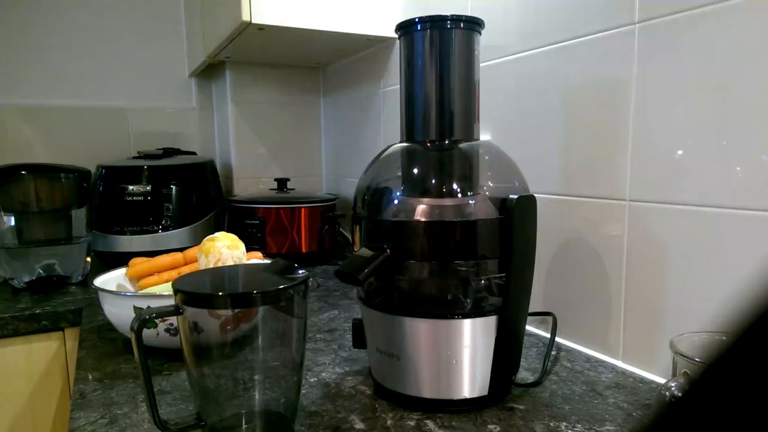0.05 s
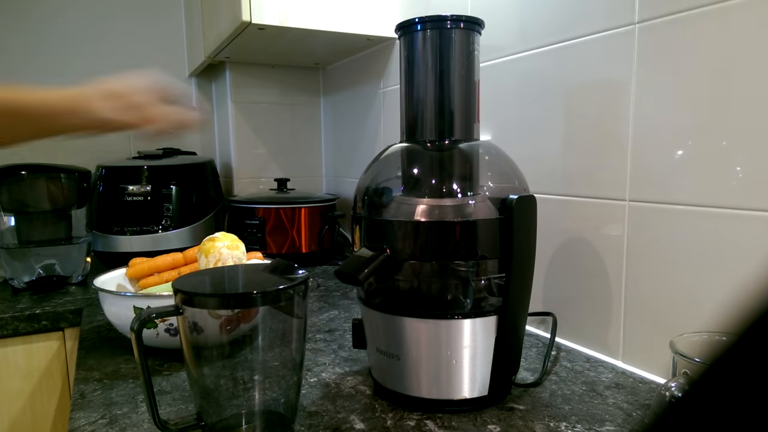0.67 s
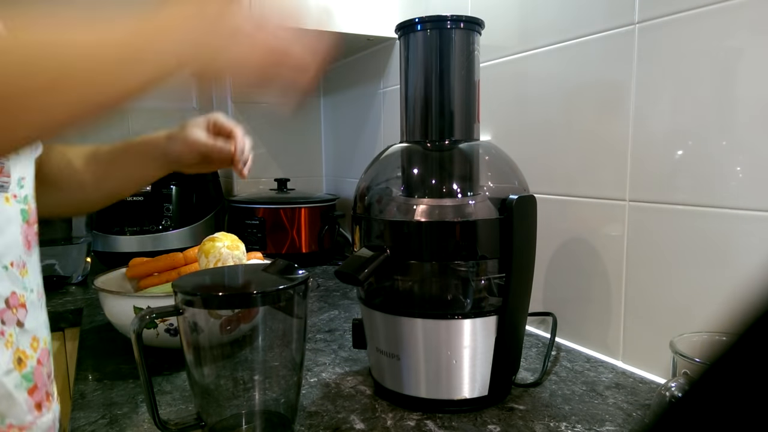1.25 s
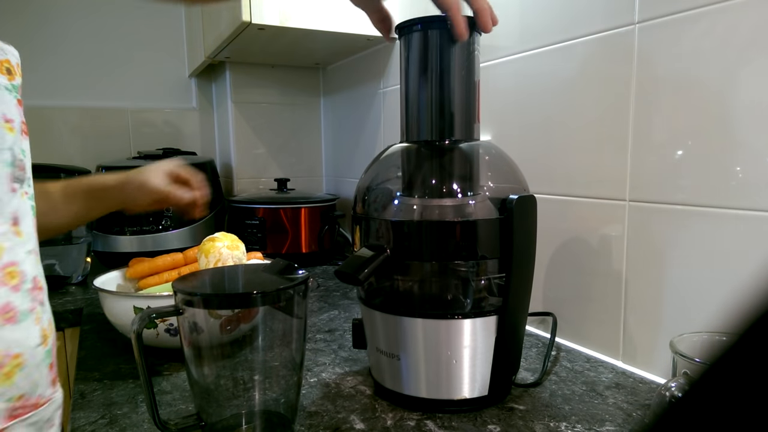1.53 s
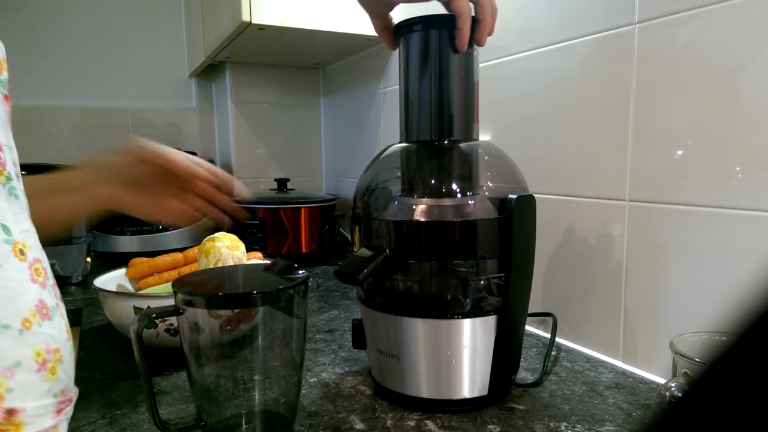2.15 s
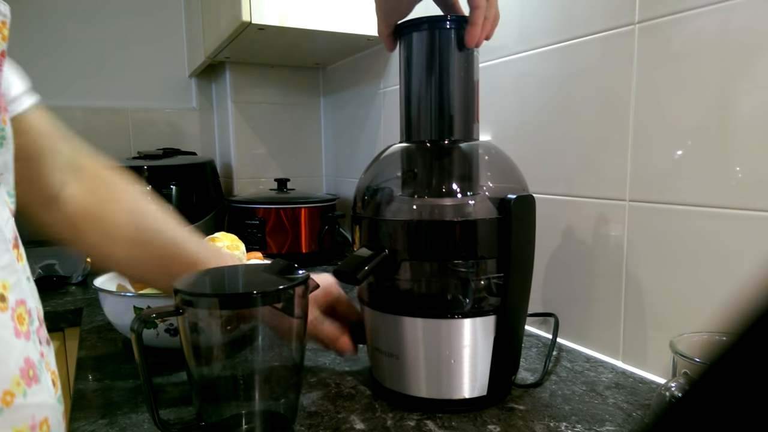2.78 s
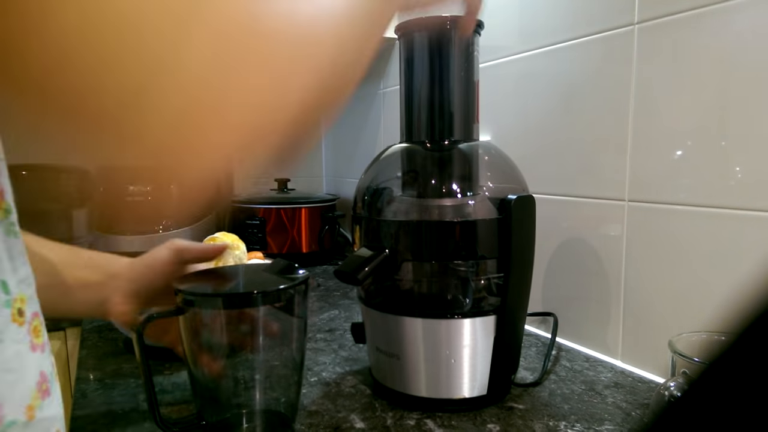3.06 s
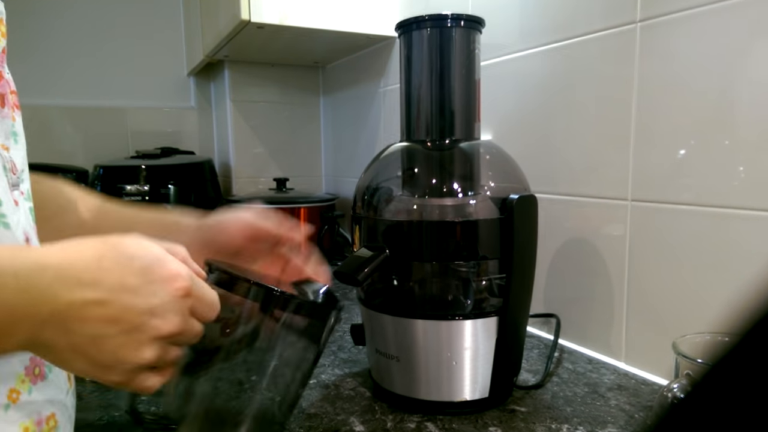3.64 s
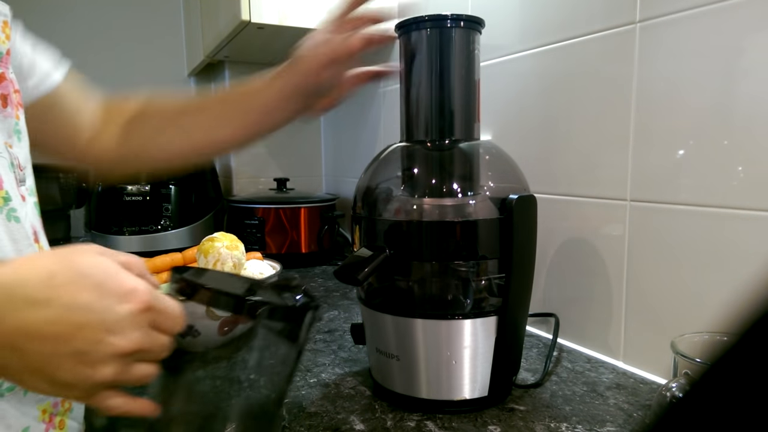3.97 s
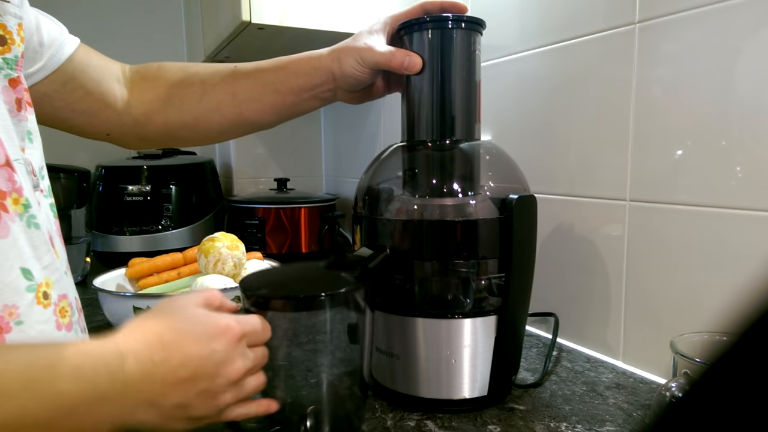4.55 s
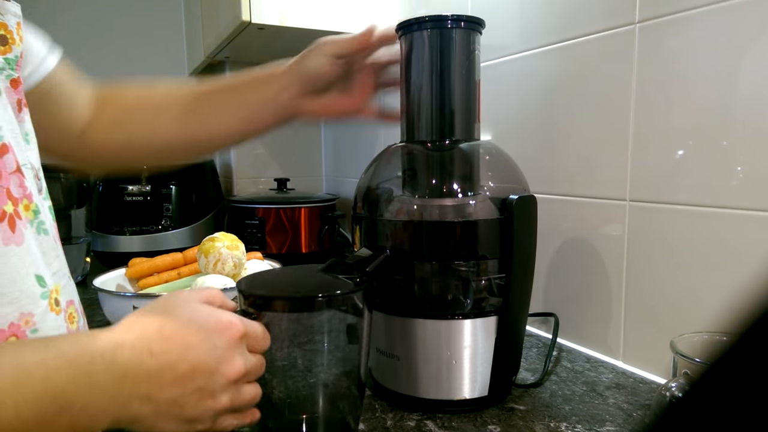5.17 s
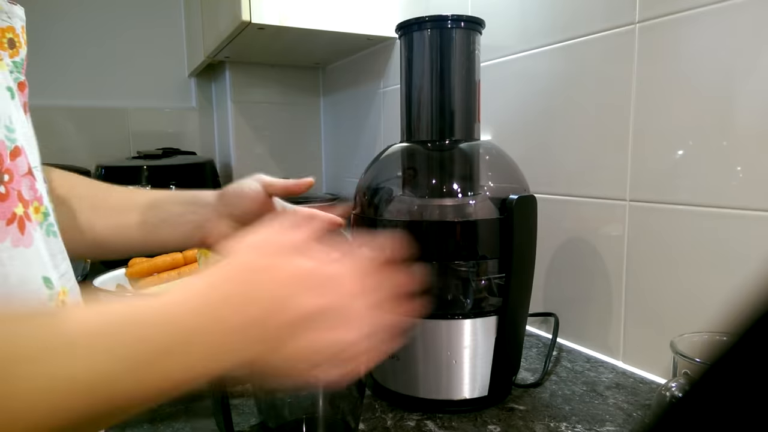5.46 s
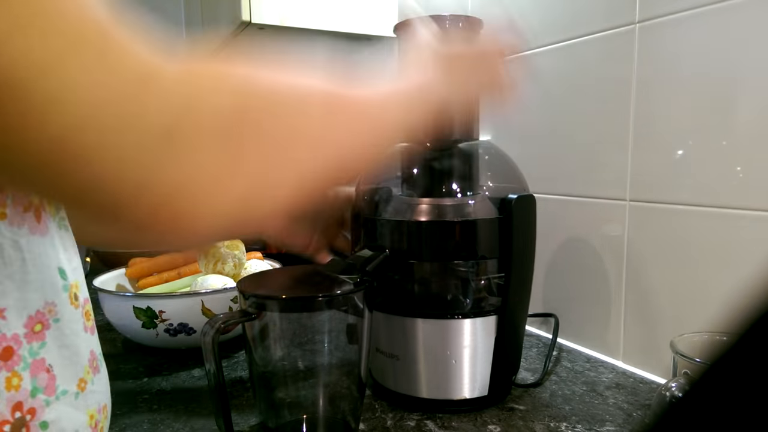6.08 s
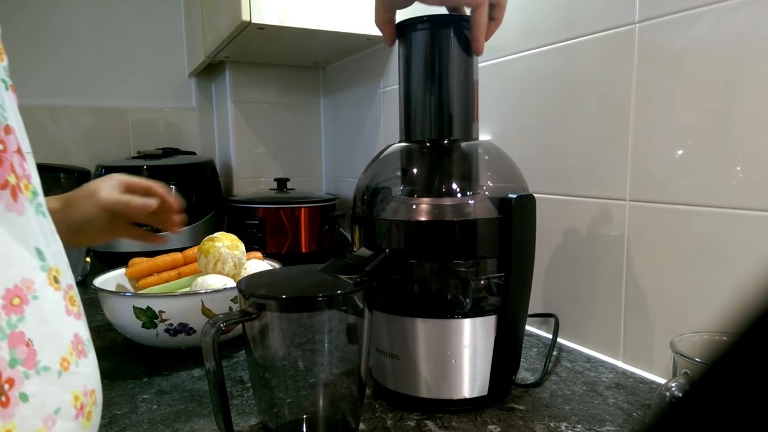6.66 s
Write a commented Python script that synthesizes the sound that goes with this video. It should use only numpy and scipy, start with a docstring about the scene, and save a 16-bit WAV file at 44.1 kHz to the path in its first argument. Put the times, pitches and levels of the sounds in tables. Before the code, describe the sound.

Faint room air in a tiled kitchen is broken by a quick run of hollow clacks as a plastic pusher drops into a juicer's feed tube. A switch snaps and the motor winds up with a brief rattle and a climbing whine, leveling off into a loud whir with hum and rushing air. While it runs empty, a plastic jug slides across the stone counter and knocks down twice, all heard from close by.

```python
"""Soft room air in a tiled kitchen, then a plastic pusher squeaks and clacks home in a juicer's feed tube.
The switch snaps and the mains motor winds up, spinning the empty centrifugal basket: a climbing whine
on multiples of the rotor speed, over rumble, a burst of chatter and the rush of air.
While it runs, a plastic jug is slid across the stone counter and set down under the spout."""
import sys
import numpy as np
from scipy import signal
from scipy.fft import rfft, irfft, next_fast_len
from scipy.io import wavfile

SR = 44100
rng = np.random.default_rng(int(sys.argv[2]) if len(sys.argv) > 2 else 0)


def file_out(sig):
    """Save sig as 16-bit WAV at sys.argv[1]."""
    # one column per channel
    cols = np.atleast_2d(sig).T
    # limit, then scale
    lim = np.clip(cols, -1, 1)
    pcm = np.round(lim * 32767).astype(np.int16)
    wavfile.write(sys.argv[1], SR, pcm)


N = 305172
TIME = np.arange(N) / SR
SIZE = next_fast_len(N + SR, True)
BINS = np.maximum(np.fft.rfftfreq(SIZE, 1 / SR), 1)
MAINS_HZ, MOTOR_ON_S = 50, 2.68
PULSE = 2 * np.pi * 2 * MAINS_HZ * TIME   # phase of the torque, which pulses twice per mains cycle


def from_db(db):
    return 10 ** (np.asarray(db) / 20)


def rms_one(x):
    return x / np.sqrt(np.mean(x ** 2) + 1e-20)


def butter(x, order, hz, kind):
    return signal.sosfilt(signal.butter(order, hz, kind, fs=SR, output="sos"), x)


def over_bins(points):
    """A curve by frequency, joined on a log axis."""
    hz, value = np.transpose(points)
    return np.interp(np.log(BINS), np.log(hz), value)


def ramp(start_s, length_s):
    """A straight fade from 0 to 1."""
    return np.clip((TIME - start_s) / length_s, 0, 1)


def swells(rows):
    """A smooth rise and fall for each (middle [s], length [s], level [dB])."""
    return sum(from_db(db) * np.cos(np.pi * np.clip((TIME - s) / length, -.5, .5)) ** 2
               for s, length, db in rows)


def drift(hz):
    """A random wobble of rms 1."""
    knots = rng.standard_normal(int(N / SR * hz * 2) + 2)
    return rms_one(np.interp(TIME * hz * 2, np.arange(len(knots)), knots))


def grains(per_s, spread_db):
    """Random tiny contacts of uneven size."""
    sizes = from_db(spread_db * np.minimum(rng.exponential(1, N), 4)) * rng.choice([-1, 1], N)
    return sizes * (rng.random(N) < per_s / SR)


def resonate(x, resonances):
    """Parallel resonators give x a body; rms 1."""
    out = 0
    for k, (hz, width, db) in enumerate(resonances):
        r = np.exp(-np.pi * width / SR)
        band = signal.lfilter([1, 0, -1], [1, -2 * r * np.cos(2 * np.pi * hz / SR), r * r], x + 1e-18)
        out = out + (-1) ** k * from_db(db) * (1 - r * r) * band
    return rms_one(out)


def boost(hz, resonances):
    """Gain of a gliding tone as it passes resonances; 1 far from them."""
    return 1 + sum((from_db(db) - 1) / (1 + (2 * (hz - centre) / width) ** 2) ** 1.35
                   for centre, width, db in resonances)


def bursts(hits, t60):
    """A dying burst of noise for each hit."""
    out, age = np.zeros(N + SR), TIME[:SR // 4]
    for s, db in hits:
        at = int(s * SR)
        out[at:at + len(age)] += from_db(db - 60 * age / t60) * rng.standard_normal(len(age))
    return out[:N]


def crack(hits, spectrum, t60):
    """Bursts in the colour of the struck thing; a minimum-phase filter keeps the attack sharp."""
    gain = from_db(over_bins(spectrum))
    cepstrum = irfft(np.log(gain), SIZE)
    cepstrum[1:SIZE // 2] *= 2
    cepstrum[SIZE // 2 + 1:] = 0
    coloured = irfft(rfft(bursts(hits, t60), SIZE) * np.exp(rfft(cepstrum)), SIZE)[:N]
    return coloured / np.sqrt(np.mean(gain ** 2))


def ring(hits, modes):
    """Each hit strikes every mode with a strength of its own."""
    s, db = np.transpose(hits)
    out = np.zeros(N)
    for hz, mode_db, t60 in modes:
        strength = from_db(db + mode_db + rng.normal(0, 2.5, len(s)))
        clicks = np.full(N, 1e-18)
        clicks[(s * SR).astype(int)] = strength * rng.choice([-1, 1])
        r, w = from_db(-60 / (t60 * SR)), 2 * np.pi * hz / SR
        out += signal.lfilter([0, np.sin(w)], [1, -2 * r * np.cos(w), r * r], clicks)
    return out


# stereo image of the noise beds: (frequency [Hz], left-right correlation [0..1])
CORRELATION = [(30, 0.96), (100, 1), (250, 0.78), (500, 0.7), (1000, 0.73), (2000, 0.068), (4000, 0.38),
               (15000, 0)]

def noise(spectrum):
    """Stereo noise of rms 1, narrow in the bass and wide in the treble."""
    mid, side = rfft(rng.standard_normal((2, SIZE)))
    alike = np.clip(over_bins(CORRELATION), -.99, .99)
    stereo = np.sqrt(1 + alike) * mid + np.sqrt(1 - alike) * side * [[1], [-1]]
    return rms_one(irfft(stereo * from_db(over_bins(spectrum)), SIZE)[:, :N])


def kitchen(x, near_db, tail_db, near_t60=0.031, tail_t60=0.52):
    """Direct sound, quick reflections off tiles and counter, and the room's tail; bass stays centred."""
    age = TIME[:SR // 2]
    near, tail = rng.standard_normal((2, 2, len(age))) * (age > .001)
    near = from_db(near_db) * rms_one(near * from_db(-60 * age / near_t60))
    tail = from_db(tail_db) * rms_one(tail * from_db(-60 * age / tail_t60))
    mid, side = (near + tail) / np.sqrt(len(age))
    echo = mid / 2 + butter(side, 1, 700, "high") * [[1], [-1]]
    direct = np.array([x, np.interp(TIME - 20e-6, TIME, x)])   # a hair later on the right
    return direct + signal.fftconvolve(x[None], echo, axes=1)[:, :N]


# colours of the room's air and of its low end: (frequency [Hz], level [dB])
AIR_COLOUR = [(47, -42), (80, -19), (104, -12.5), (125, -0.5), (170, -17.5), (337, -16), (480, -21),
              (781, -25), (1190, -29.5), (1370, -19.5), (1700, -29), (2200, -26.5), (2800, -24),
              (4500, -30.5), (6300, -38.5), (15800, -40)]
BUMP_COLOUR = [(15, 2), (40, 20), (60, -1), (100, -3), (200, -47)]
# soft bumps in the room: (middle [s], length [s], level [dB])
BUMP_SWELLS = [(.33, 0.2, -59), (.48, .14, -65), (.795, 0.12, -45.5), (.88, 0.22, -60)]

def room_tone():
    """A bed of soft air fades in, with a distant fan's hum and a few low bumps."""
    fan_level = from_db(-1 + 0.54 * drift(3.4))
    fan_hz = 123 + 1.5 * drift(24)
    fan = fan_level * np.sin(2 * np.pi * np.cumsum(fan_hz) / SR)
    low = (from_db(-75) + swells(BUMP_SWELLS)) * noise(BUMP_COLOUR)
    fade_in = from_db(-43) + ramp(.07, 0.25)
    return fade_in * (from_db(-58) * (noise(AIR_COLOUR) + fan) + low)


# clicks of the switch: (time [s], level [dB])
SWITCH_HITS = [(2.6835, -18.5), (2.6855, -17), (2.699, -20.5)]
# colour of the snap: (frequency [Hz], level [dB])
SWITCH_COLOUR = [(180, -44), (300, -17), (385, -12), (1110, 3), (1550, -6), (2550, -3.5), (2770, -4),
                 (3160, 2), (5470, -17.5), (15800, -28)]

def switch():
    """The rotary switch snaps over in a tight cluster of clicks."""
    snap = from_db(-3.5) * crack(SWITCH_HITS, SWITCH_COLOUR, t60=0.017)
    return kitchen(snap, near_db=-0.5, tail_db=2.5)


# pusher hitting the feed tube: (time [s], level [dB], thud send [dB])
PUSHER_HITS = [(1.88, -49, -12), (1.909, -36.5, 4), (1.926, -23, -3), (1.933, -25, 5), (1.9622, -17.5, -4),
               (2.03, -30.5, 2), (2.0975, -16, 0.5), (2.11, -27, 4), (2.336, -26, -4), (2.356, -36, -18),
               (2.5, -44, -14)]
# colour of the tube's attack: (frequency [Hz], level [dB])
TUBE_COLOUR = [(120, -42), (200, -12), (427, 0.5), (789, -12), (998, -4), (1310, -9.5), (1510, -3.5),
               (1720, -10), (2380, -6.5), (3290, -8), (3940, -11.5), (6530, -35), (10000, -45),
               (15000, -68)]
# ring of the tube: (frequency [Hz], level [dB], t60 [s])
TUBE_MODES = [(368, -5.5, 0.62), (597, -2.5, 0.33), (1026, -2, 0.22), (1068, -7.5, 0.5), (1470, 1, .15),
              (2055, -7, 0.085), (2190, -5, 0.26), (2650, -26, .2), (3000, 1, 0.08), (3160, -8, 0.2),
              (3560, -17, 0.19)]
# fingers slipping on the pusher: (middle [s], length [s], level [dB])
SQUEAKS = [(1.562, 0.021, -60), (1.597, 0.041, -70), (1.765, .07, -59)]
# voice of the squeak: (frequency [Hz], width [Hz], level [dB])
SQUEAK_BANDS = [(2220, 75, 0), (3640, 130, 1)]

def pusher():
    """Fingers squeak, then plastic hits plastic: the tube rings and the machine thuds on its feet."""
    hits = [(s, db) for s, db, _ in PUSHER_HITS]
    thud_hits = [(s, db + send_db) for s, db, send_db in PUSHER_HITS]
    thud = ring(thud_hits, modes=[(106.4, -13.5, 0.24), (127, -11.5, 0.25)])
    clack = from_db(-5.5) * crack(hits, TUBE_COLOUR, t60=0.079) + from_db(-21.5) * ring(hits, TUBE_MODES)
    squeak = swells(SQUEAKS) * resonate(grains(1100, spread_db=1), SQUEAK_BANDS)
    return kitchen(clack + squeak, near_db=-6, tail_db=-1.5) + butter(thud, 6, 85, "high")


# pushes across the counter: (middle [s], length [s], level [dB])
JUG_SLIDES = [(3.63, .26, -34.5), (3.76, 0.15, -28), (4.19, 0.46, -32), (4.73, 0.17, -31.5),
              (4.88, .13, -28)]
# hollow body of the jug: (frequency [Hz], width [Hz], level [dB])
JUG_HOLLOW = [(286, 25, 1.5), (349, 15, 7), (570, 80, -11), (774, 68, -10.5), (1260, 290, -26)]
# jug hitting the counter: (time [s], level [dB])
JUG_HITS = [(4.6345, -6.5), (4.645, -14.5), (4.678, -17.5), (4.726, -18.5), (4.869, -18), (5.2045, -9)]
# colour of its attack: (frequency [Hz], level [dB])
JUG_COLOUR = [(150, -16), (300, -2), (450, 1.5), (800, 4.5), (1300, -2.5), (1800, -10), (3000, -10),
              (6000, -28), (15000, -67)]
# ring of the jug: (frequency [Hz], level [dB], t60 [s])
JUG_MODES = [(301, -1.5, 0.094), (409, -1.5, 0.098), (499, -3, 0.092), (680, -11, 0.074), (813, -8.5, 0.27),
             (877, -4.5, 0.12), (1314, -1.5, 0.2)]

def jug():
    """The jug judders across the stone and knocks down on it; it is too small to radiate bass."""
    slide = swells(JUG_SLIDES) * resonate(grains(700, spread_db=1), JUG_HOLLOW)
    attack = from_db(-3.5) * crack(JUG_HITS, JUG_COLOUR, t60=0.052)
    body = from_db(-14) * ring(JUG_HITS, JUG_MODES)
    return kitchen(butter(slide + attack + body, 2, 110, "high"), near_db=-0.5, tail_db=-1.5)


# stages of the run-up: (speed gained [turns/s], time constant [s])
RUN_UP = [(24.959, .03666), (61.747, .23163), (122.091, 1.07)]
FREE_SPEED = sum(gain for gain, _ in RUN_UP)

def rotor_speed():
    """Turns per second: a quick kick, a pull and a slow settling."""
    running_s = np.maximum(TIME - MOTOR_ON_S, 1 / SR)
    return sum(gain * (1 - np.exp(-running_s / lag_s)) for gain, lag_s in RUN_UP)


def rotor_angle(speed):
    """The rotor's phase, uneven while the motor labours at low speed."""
    strain = np.clip(1 - speed / 175, 0, 1)
    jitter = .0004 * drift(25) + .0008 * drift(150) + .04 * drift(250) * strain
    return 2 * np.pi * np.cumsum(speed * (1 + jitter)) / SR


def current(speed, idle=0.13):
    """The current, 1 at standstill, falls as the rotor gains speed."""
    return 1 - (1 - idle) * speed / FREE_SPEED


# mix of the motor's layers, by name: (gain [dB], speed exponent, current exponent)
MOTOR_MIX = {"unbalance": (-44, 2.1, 0.039), "hum": (-34, 0.12, 2.2), "third": (-22.5, 1.96, 1.14),
             "sums": (-37, 2.24, 0.31), "rumble": (-36.5, 0.99, .03), "housing": (-35, 0.74, 0.0071),
             "rush": (-30, 2.27, 0.0057), "hiss": (-31.5, 1.05, 0.65), "chatter": (-15, 1.39, 2.01)}

def fader(layer, speed):
    """A layer's gain rides on speed and current."""
    db, speed_power, current_power = MOTOR_MIX[layer]
    return from_db(db) * (speed / FREE_SPEED) ** speed_power * current(speed) ** current_power


# colours of the motor's four noise beds: (frequency [Hz], level [dB])
RUMBLE_COLOUR = [(18, -64), (30, -34), (54, -30), (90, -8), (114, 1), (134, 0.5), (178, -7), (195, -12.5),
                 (250, -17), (430, -120)]
HOUSING_COLOUR = [(120, -43), (210, -8), (242, -4), (286, -1), (408, 0.5), (454, -6.5), (497, -5),
                  (543, -11), (809, -12), (900, -2.5), (983, -13), (1140, -6.5), (1340, -10.5), (1630, -18),
                  (1750, -19.5), (2280, -28), (3850, -120)]
RUSH_COLOUR = [(1000, -50), (1700, -21), (1950, -2), (2130, -5.5), (2300, -1), (2840, -4), (3190, -1.5),
               (3450, -5), (3840, -5), (4180, -10.5), (5650, -17), (6460, -24.5), (7200, -25), (9360, -47),
               (15800, -120)]
BRUSH_COLOUR = [(3530, -27), (6000, -22), (6450, 2), (7080, -3.5), (9290, -3.5), (10300, -8.5),
                (14300, -1.5), (14800, -6), (15800, 3)]

def motor_noise(speed):
    """Rumble through the feet, booming housing, air torn by the basket, brushes sparking with the mains."""
    rumble = fader("rumble", speed) * noise(RUMBLE_COLOUR)
    housing = fader("housing", speed) * from_db(drift(18)) * noise(HOUSING_COLOUR)
    boom = butter(housing, 1, 450, "low")
    brightness = 1.47 * (speed / speed.max()) ** 1.2
    housing = boom + (housing - boom) * brightness
    rush = fader("rush", speed) * from_db(0.86 * drift(40)) * noise(RUSH_COLOUR)
    sparking = from_db(0.99 * drift(300) + 0.59 * drift(5.4)) * (1 + 0.06 * np.cos(PULSE))
    hiss = fader("hiss", speed) * sparking * noise(BRUSH_COLOUR)
    return rumble + housing + rush + hiss


# basket knocking on its coupling: (time [s], level [dB])
BASKET_HITS = [(2.789, -30), (2.822, -33), (2.84, -25), (2.852, -25.5), (2.951, -26), (2.99, -26.5),
               (3.093, -43), (3.229, -22)]
# body of the basket: (frequency [Hz], width [Hz], level [dB])
BASKET_BANDS = [(1045, 74, -11.5), (1430, 65, -9), (2260, 180, -4), (3916, 410, 2), (5230, 540, -9.5),
                (6300, 1360, -15)]

def basket_chatter(speed):
    """The basket chatters and knocks as it takes up the drive."""
    rattle = rms_one(grains(2000, spread_db=2.5) * (1 + 0.25 * np.cos(PULSE)))
    contacts = fader("chatter", speed) * ramp(2.745, .04) * rattle + bursts(BASKET_HITS, t60=0.022)
    chatter = np.std(contacts) * resonate(contacts, BASKET_BANDS)
    return kitchen(chatter, near_db=1.5, tail_db=-20)


# low resonances of the machine on its feet: (frequency [Hz], width [Hz], boost [dB])
MOUNT = [(108.5, 30, 26.5), (132.5, 14, 27.5), (203.5, 10.5, 7.5), (488.8, 20.4, 6.5)]
# tones at the rotor speed plus a multiple of the torque pulse rate: (multiple, level [dB])
SUM_TONES = [(2, -23), (3, -1), (5, -7.5), (11, -7.5)]

def motor_hum(speed, angle):
    """The low end: the unbalanced rotor shakes, the torque pulses hum, and the two mix into sum tones."""
    shake = fader("unbalance", speed) * boost(speed, MOUNT) * from_db(0.68 * drift(6)) * np.sin(angle)
    hum = fader("hum", speed) * np.sin(PULSE)
    third = fader("third", speed) * from_db(2.6 * drift(5.4)) * np.sin(3 * PULSE)
    sums = 0
    for k, db in SUM_TONES:
        level = from_db(db + 1.4 * drift(3)) * boost(speed + 2 * MAINS_HZ * k, MOUNT)
        sums += level * np.sin(angle + k * PULSE)
    return shake + hum + third + fader("sums", speed) * sums


# lead tones of the slots and commutator:
# (rotor multiple before rounding, level [dB], current exponent, waver [dB], entry speed [turns/s])
LEAD_TONES = [(16.2, -49.5, 0.1, 1.3, 51), (31, -55, .35, -1, 56), (32, -45, 0.21, 1, 70),
              (35, -61, 1.4, 4, 98), (48, -48, 0.68, 3.5, 107), (64, -45.5, 0.62, 1.6, 104),
              (95.4, -49, 1.5, -1, 79)]
# lesser tones that fill in near full speed: (rotor multiple, level [dB])
FILL_TONES = [(2, -41), (10, -48), (13, -44), (18, -45), (19, -47), (22, -50), (23, -51), (28, -58),
              (29, -58), (45, -60), (46, -66), (47, -65), (60, -72), (65, -65)]
# peaks and a dip of the casing: (frequency [Hz], width [Hz], boost [dB])
CASING = [(1700, 670, -22), (2350, 400, 19.5), (2770, 270, 12), (3164, 43, 18), (3232, 41, 15),
          (3294, 19, 16), (3840, 640, 19.5), (4700, 480, 16), (5157, 300, 21), (6160, 830, 7.5)]

def motor_whine(speed, angle):
    """Slot and commutator tones climb through the casing's resonances; the torque pulses flutter them."""
    load = current(speed)
    depth = 0.41 + 0.5 * load   # the starting current deepens the flutter
    tremolo = 1 + depth * (0.38 * np.cos(PULSE) + 0.37 * np.cos(2 * PULSE + 1))
    vibrato = depth * (np.sin(PULSE) + .55 * np.sin(2 * PULSE + 2) + .25 * np.sin(3 * PULSE))
    lead = fill = 0
    for k, db, current_power, waver_db, entry_speed in LEAD_TONES:
        level = from_db(db + waver_db * drift(7)) * load ** current_power
        entry = 1 / (1 + (abs(entry_speed) / speed) ** 3.1)
        tone = np.sin(round(k) * angle + vibrato * np.sqrt(k / 30))
        lead += level * entry * boost(round(k) * speed, CASING) * tone
    for k, db in FILL_TONES:
        level = from_db(db + 4.1 * drift(4))
        fill += level * np.sin(k * angle + rng.uniform(0, 2 * np.pi) + vibrato * k / 70)
    whine = rms_one(tremolo) * (lead + fill * (speed / speed.max()) ** 3.5)
    return kitchen(whine, near_db=-7, tail_db=0)


def scene():
    """The pusher is seated, the motor is switched on and winds up, the jug is moved under the spout."""
    speed = rotor_speed()
    angle = rotor_angle(speed)
    motor = motor_whine(speed, angle) + motor_hum(speed, angle)
    motor += motor_noise(speed) + basket_chatter(speed)
    return ramp(MOTOR_ON_S, 0.022) * motor + pusher() + switch() + jug() + room_tone()


# stereo balance: (frequency [Hz], left minus right [dB])
BALANCE = [(60, 3), (99, -1.5), (160, -2.5), (270, 0.5), (450, 1.5), (740, -1), (1220, 2.5), (2010, -1.0),
           (3330, -2), (5500, -3), (9080, 1), (15000, -19)]

def record(dry):
    """Each band leans left or right at constant power; a steep low-pass cuts the very top."""
    lean = from_db(over_bins(BALANCE) / 2 * [[1], [-1]])
    lean = lean / np.sqrt(np.mean(lean ** 2, axis=0))
    low_pass = 1 / np.sqrt(1 + (BINS / 15850) ** 300)
    return irfft(rfft(dry, SIZE) * lean * low_pass, SIZE)[:, :N]


dry = scene()
out = record(dry)
file_out(out)
```